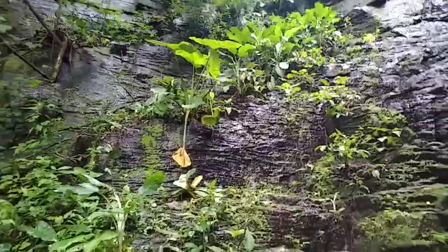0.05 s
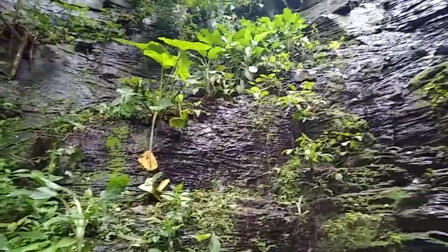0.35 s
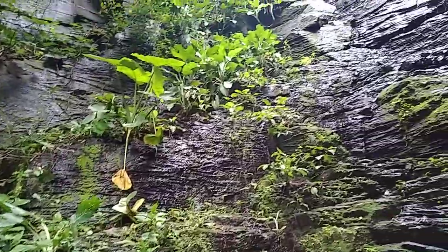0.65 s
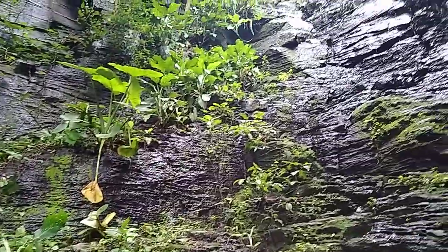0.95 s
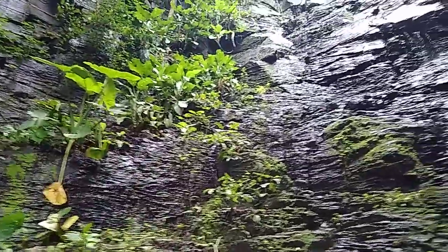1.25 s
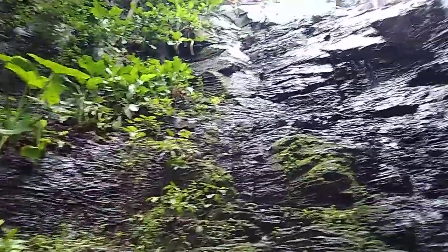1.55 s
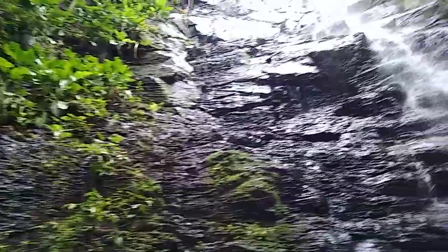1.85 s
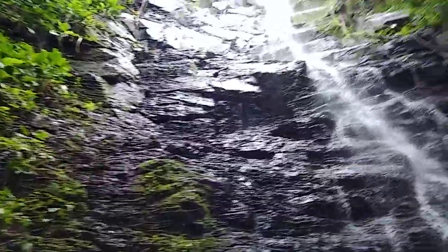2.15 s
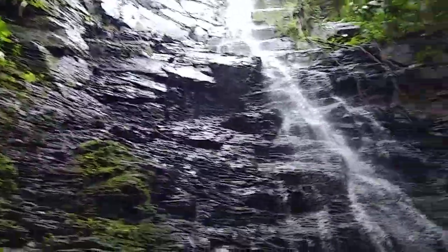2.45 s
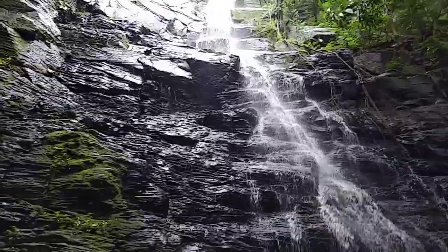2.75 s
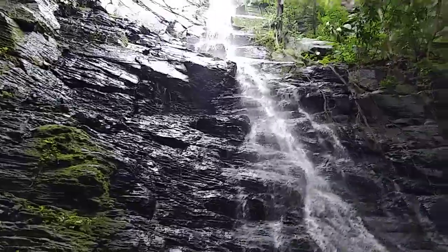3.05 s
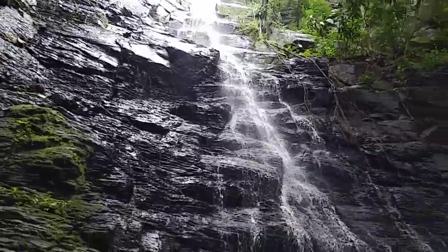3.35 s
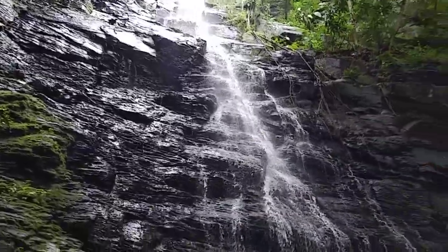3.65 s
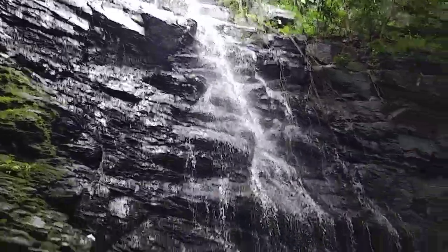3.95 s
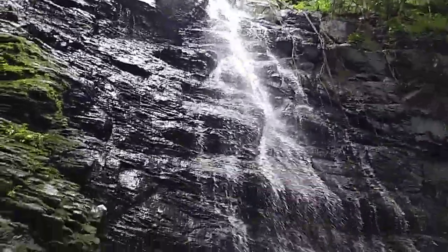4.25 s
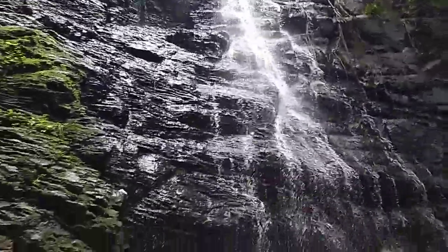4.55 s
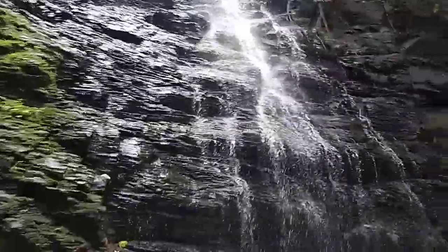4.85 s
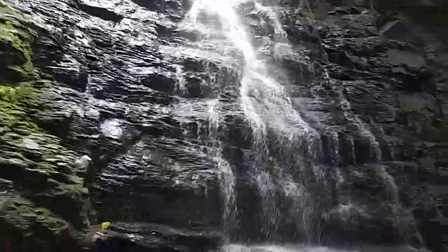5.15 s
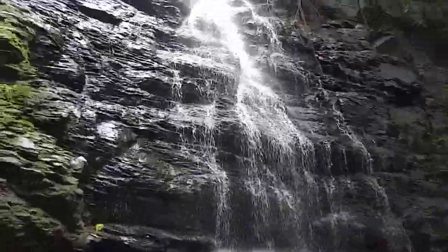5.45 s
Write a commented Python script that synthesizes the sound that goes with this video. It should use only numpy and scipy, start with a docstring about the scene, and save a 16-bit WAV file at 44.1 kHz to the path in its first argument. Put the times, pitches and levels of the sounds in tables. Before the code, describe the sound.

Water shatters on rock ledges in a continuous, even spray, high and fizzy with little bass, heard outdoors through a moving hand-held microphone. Soft, dull taps of stray drops fall close by throughout. Brief sharper splashes stand out about a third of the way in, then the hiss takes on a slightly hollow colour. Near the end come several more splashes and one clearer plop.

```python
"""A thin waterfall runs down a rock face and shatters on the ledges: hissing spray, splashes, small bubbles.
A hand-held mono microphone turns towards it. A very short echo off a surface close by makes the hiss
sound hollow, and that hollow tone shifts with the angle. Stray drops patter dully around the
microphone, a few land with a plop, and now and then a clump of water slaps a ledge."""
import sys
import numpy as np
from scipy import signal
from scipy.fft import rfft, irfft
from scipy.io import wavfile
from scipy.ndimage import map_coordinates

SR = 44100
rng = np.random.default_rng(int(sys.argv[2]) if len(sys.argv) > 2 else 0)


def int16_out(signal):
    """Quantize to a 16-bit WAV file."""
    q = np.round(np.clip(np.atleast_2d(signal).T, -1, 1) * 32767)
    wavfile.write(sys.argv[1], SR, q.astype(np.int16))


N = 246078
T = np.arange(N) / SR
FREQS = np.maximum(np.fft.rfftfreq(N, 1 / SR), 1)
TOP_HZ = 15750


def undb(db):
    """Turn decibels into a number to multiply by."""
    return 10 ** (np.asarray(db) / 20)


def unit(x):
    """Scale to an average (rms) level of 1."""
    return x / np.sqrt(np.mean(x ** 2))


def shape(x, gain):
    """Turn each frequency up or down by its own gain."""
    return irfft(rfft(x) * gain, N)


def resonance(hz, width_hz):
    """Gains that keep one band of frequencies, 1 at its centre."""
    return 1 / (1 + 1j * (FREQS ** 2 - hz ** 2) / (FREQS * width_hz))


def lowpass(hz, order):
    """Gains that keep the lows; a higher order cuts more steeply."""
    return 1 / np.sqrt(1 + (FREQS / hz) ** (2 * order))


def wander(rate_hz):
    """A smooth random drift, about 1 in size."""
    return unit(shape(rng.standard_normal(N), lowpass(rate_hz, order=2)))


def add(out, start_s, sound):
    """Mix in a short sound."""
    start = int(np.clip(start_s * SR, 0, N - 1))
    out[start:start + len(sound)] += sound[:N - start]


def impacts(per_second, spread_db):
    """Drops hit at random, one click each: many small, a few large."""
    chance, size = rng.random(N), rng.standard_normal(N)
    sign = np.sign(rng.standard_normal(N))
    return unit((chance < per_second / SR) * sign * undb(spread_db * np.clip(size, -2, 2)))


def ring(hz, cycles, glide, swell):
    """An air pocket or wet surface swells for a share of its life, then fades as its pitch slides."""
    age = np.linspace(0, 1, max(int(cycles * SR / hz), 8))
    envelope = (1 - np.exp(-(age / swell) ** 2)) * np.exp(-np.log(1000) * age)
    phase = 2 * np.pi * cycles * (age + glide * age ** 2 / 2)
    return np.sin(phase) * envelope / envelope.max()


def spray(flicker_db, splash_db):
    """Far mist and nearer splashes: each stream fills its own band and flickers on its own."""
    out = np.zeros(N)
    centres = np.linspace(0, np.sqrt(TOP_HZ), 14)  # square roots of Hz, so high bands are wider
    for centre in centres:
        off_centre = np.clip(abs(np.sqrt(FREQS) - centre) / centres[1], 0, 1)
        water = rng.standard_normal(N) + undb(splash_db) * impacts(per_second=900, spread_db=3.0)
        band = shape(water, np.cos(np.pi / 2 * off_centre))
        out += band * undb(flicker_db * wander(rate_hz=2.4))
    return unit(out)


def bubbles(low_hz, high_hz, cycles, glide, spread_db, count):
    """Small bubbles trapped on the ledges each ring with a short rising chirp."""
    out = np.zeros(N)
    for when, pitch, life, size in rng.random((count, 4)):
        hz = low_hz * (high_hz / low_hz) ** pitch
        gain = undb(spread_db * min(-np.log(1 - size), 4)) * hz / high_hz
        add(out, when * N / SR, gain * ring(hz, cycles * (.5 + life), glide, swell=0.014))
    return unit(out)


# The tone of the spray, heard from the side. Each row: frequency in Hz, relative level in dB.
SPRAY_TONE = [(60, -67), (170, -39.5), (330, -29), (500, -20.5), (800, -12.5), (1200, -6), (1750, -0.5),
              (2600, -4.5), (3850, 0.62), (5200, -2.5), (7000, -3.5), (8900, -7.5), (12300, -9.5),
              (14000, -6.5)]
# Narrow rings of the microphone's opening. Each row: frequency in Hz, width in Hz, boost in dB.
PORT_RINGS = [(8090, 380, 3.5), (10000, 580, 6)]


def waterfall():
    """Spray, bubbles and drops ticking on rock all surge together as the water arrives in clumps."""
    water = spray(flicker_db=0.39, splash_db=-5)
    chirps = bubbles(low_hz=702.3, high_hz=8980, cycles=85, glide=0.051, spread_db=2.0, count=3200)
    ticks = impacts(per_second=1000, spread_db=5.5)
    water += undb(-14.5) * chirps + undb(-12.0) * ticks
    surge_db = 0.1 * wander(rate_hz=22) + 0.51 * wander(rate_hz=12)
    tone_hz, tone_db = np.transpose(SPRAY_TONE)
    tone = undb(np.interp(np.log(FREQS), np.log(tone_hz), tone_db))
    port = 1 + sum((undb(db) - 1) * abs(resonance(hz, width)) ** 2 for hz, width, db in PORT_RINGS)
    return unit(shape(water * undb(surge_db), tone * port))


# The microphone's turn. Each row: time in seconds, level in dB, gap between the echo's dips in Hz
# (1 / its delay), echo strength from 0 to 1, change in the sheen (a band of treble) in dB.
TURN_PATH = [(0, -22.3, 3880, 0.06, -.5), (1.2, -21.9, 3920, .02, 0), (1.65, -21, 3850, 0.1, -2.5),
             (2.4, -21.5, 3470, .27, 0.5), (2.9, -22, 3250, .36, -0.2), (4.1, -22, 3080, 0.37, -1),
             (4.95, -22, 3220, 0.3, -4), (5.25, -22, 3450, 0.27, -7), (5.4, -22, 3980, 0.3, -2.5),
             (5.58, -22, 4440, 0.3, -.5)]


def microphone_turn(water, phase_turns, echo_top_hz, sheen_hz, sheen_width_hz):
    """A very short echo weakens evenly spaced frequencies; these dips slide as the microphone turns."""
    times, *columns = np.transpose(TURN_PATH)
    level_db, gap_hz, strength, sheen_db = [np.interp(T, times, column) for column in columns]
    # a small surface shifts each wave ahead by part of a cycle and loses the highest treble
    bounced = shape(water, np.exp(2j * np.pi * phase_turns) * lowpass(echo_top_hz, order=4))
    echo = map_coordinates(bounced, [(T - 1 / gap_hz) * SR], order=3, mode="nearest")
    heard = water + strength * echo
    # the microphone's body shades or favours short waves
    sheen = shape(heard, abs(resonance(sheen_hz, sheen_width_hz)) ** 2)
    return undb(level_db) * (heard + (undb(sheen_db) - 1) * sheen)


# The heavier stray drops. Each row: time in seconds, peak level in dB.
HEAVY_TAPS = [(.192, -46), (.272, -46), (.357, -42), (1.064, -44), (1.111, -43), (1.156, -43), (1.428, -49),
              (1.911, -43), (1.952, -45), (2.157, -48), (2.319, -49), (2.396, -48), (2.827, -45),
              (3.246, -44), (3.424, -43), (3.632, -45), (3.807, -47), (4.108, -43), (4.514, -46),
              (4.616, -45), (4.864, -45), (5.166, -42), (5.3, -45), (5.527, -42)]


def patter(light_db, flurry_db, wash_db, lull_s, lull_half_s, lull_db):
    """Stray drops land nearby as dull taps: light ones in random flurries, heavier ones singly."""
    dull_tap = resonance(hz=234, width_hz=320) * lowpass(hz=555, order=3)
    light = impacts(per_second=46, spread_db=3.0) + undb(wash_db) * rng.standard_normal(N)
    light *= undb(flurry_db * wander(rate_hz=3.4))
    light = unit(shape(light, dull_tap))
    dip_db = lull_db * np.exp(-((T - lull_s) / lull_half_s) ** 2)  # the light taps go quiet once
    heavy = np.zeros(N)
    for start_s, db in HEAVY_TAPS:
        add(heavy, start_s, undb([db]))
    heavy = shape(heavy, dull_tap / irfft(dull_tap, N).max())
    return light * undb(light_db + dip_db) + heavy


# Large drops close by. Each row: start in seconds, pitch in Hz, peak level in dB,
# level of the thud compared with the plop in dB.
NEAR_DROPS = [(.186, 457, -41, -12), (.348, 318, -40, -8), (2.814, 573, -37, -27), (4.092, 427, -42, -14),
              (4.383, 475, -35, -10), (4.937, 444, -43, -8), (5.103, 530, -28, -11)]


def plops(cycles, glide, swell, thud_hz, thud_cycles, thud_lag_s):
    """A large drop lands with a short plop that falls in pitch, then a thud."""
    out = np.zeros(N)
    for start_s, hz, db, thud_db in NEAR_DROPS:
        add(out, start_s, undb(db) * ring(hz, cycles, glide, swell))
        add(out, start_s + thud_lag_s, undb(db + thud_db) * ring(thud_hz, thud_cycles, glide, swell))
    return out


# Heavier slaps of water. Each row: loudest moment in seconds, band centre in Hz, band width in Hz,
# rough time to swell (and again to fade) in seconds, rms level at the loudest moment in dB.
LEDGE_SLAPS = [(1.808, 4450, 2400, .03, -23.5), (1.818, 2040, 700, 0.016, -27),
               (1.902, 4500, 1800, 0.0042, -19.5), (2.443, 7800, 1500, 0.017, -28),
               (4.185, 3740, 1000, 0.066, -27.5), (4.653, 3800, 1300, .025, -26.5),
               (4.938, 3860, 1300, 0.014, -27), (5.106, 1150, 500, 0.012, -28),
               (5.492, 2270, 550, 0.018, -21.5), (5.56, 5300, 1500, 0.013, -23)]


def slaps():
    """A clump of water bursts on a ledge: a brief swell of noise in one band."""
    out = np.zeros(N)
    for peak_s, hz, width_hz, swell_s, db in LEDGE_SLAPS:
        splash = unit(shape(rng.standard_normal(N), resonance(hz, width_hz) ** 2))
        out += undb(db) * splash * np.exp(-2 * ((T - peak_s) / swell_s) ** 2)
    return out


def scene():
    """Mix the waterfall, drops and slaps, the same in both channels."""
    water = waterfall()
    mix = microphone_turn(water, phase_turns=0.31, echo_top_hz=10700, sheen_hz=7760, sheen_width_hz=1260)
    mix += patter(light_db=-64.5, flurry_db=2.5, wash_db=-19, lull_s=0.79, lull_half_s=0.17, lull_db=-17)
    mix += plops(cycles=14.0, glide=-0.17, swell=0.12, thud_hz=129, thud_cycles=2.1, thud_lag_s=0.0072)
    mix += slaps()
    return np.array([mix, mix])


def record(dry):
    """The recorder steeply cuts the treble above TOP_HZ."""
    return signal.sosfilt(signal.ellip(12, .1, 85, TOP_HZ, fs=SR, output="sos"), dry)


dry = scene()
out = record(dry)
int16_out(out)
```